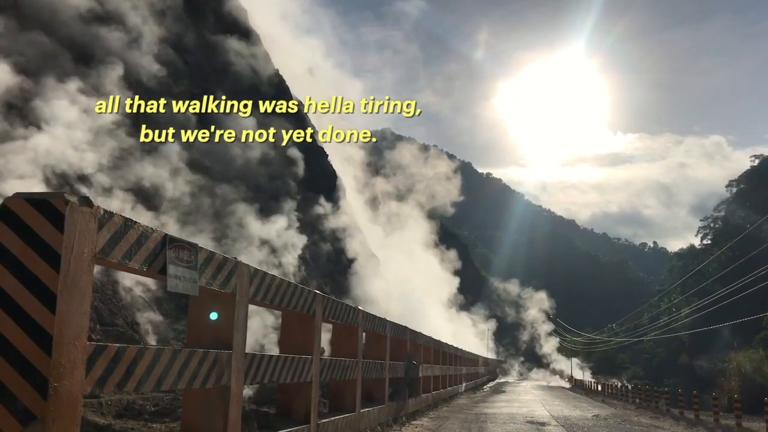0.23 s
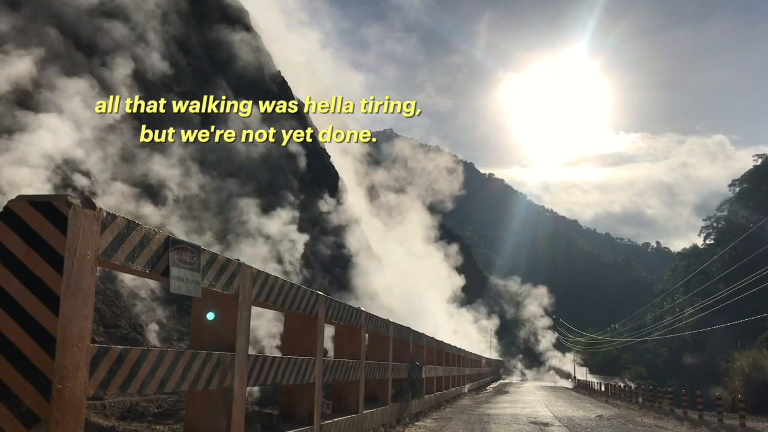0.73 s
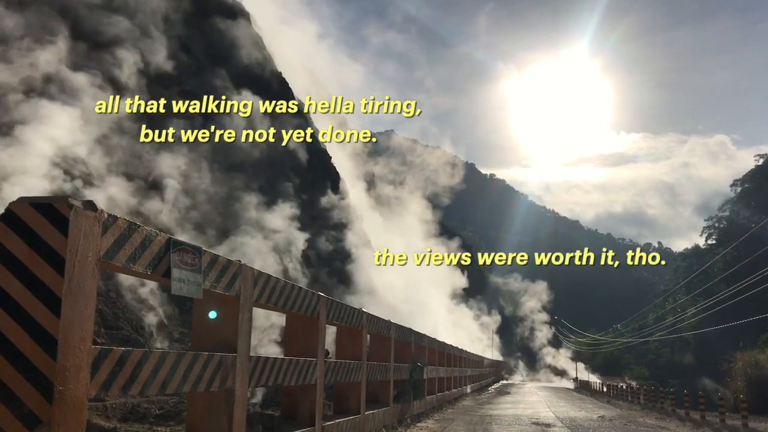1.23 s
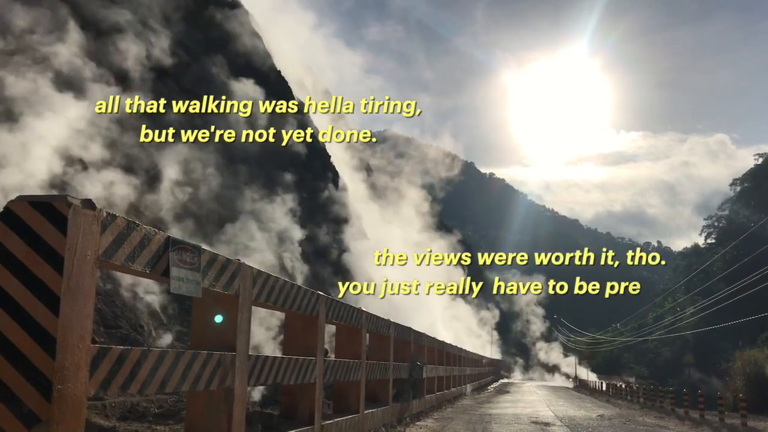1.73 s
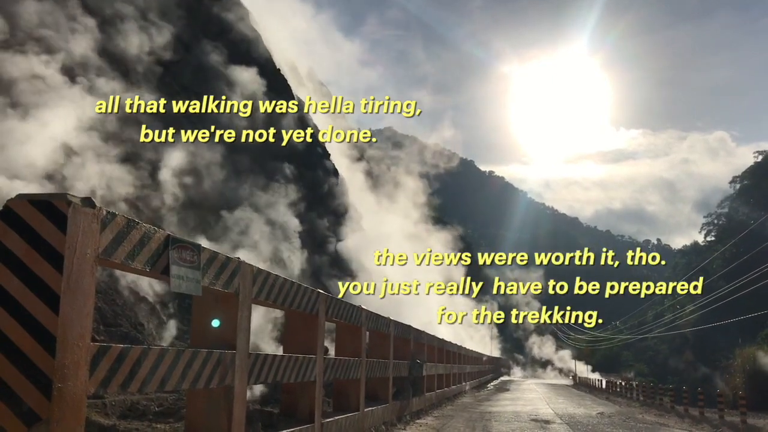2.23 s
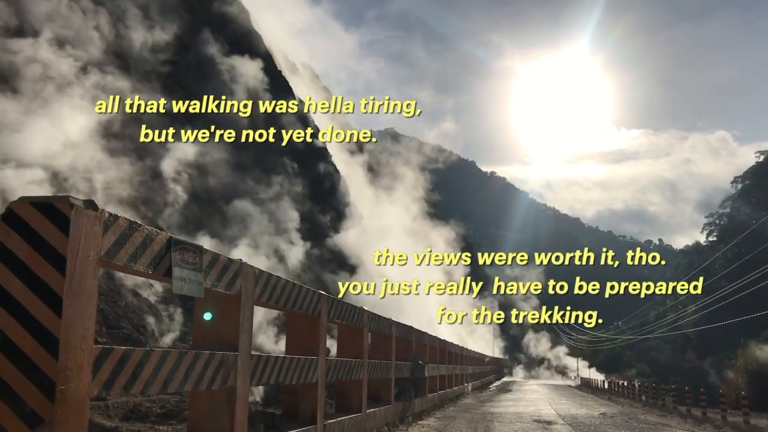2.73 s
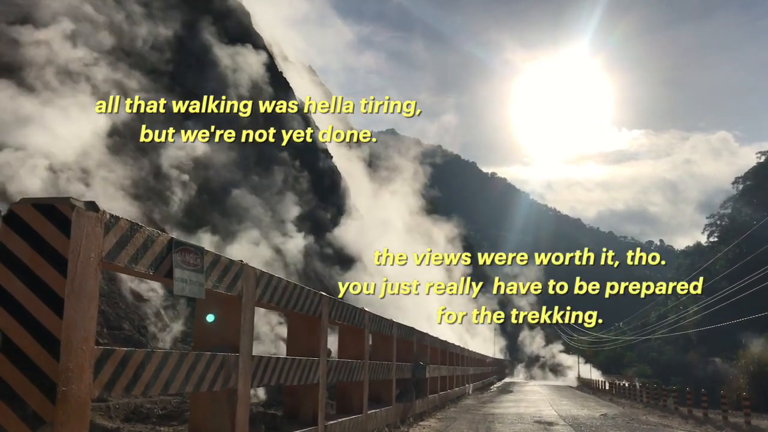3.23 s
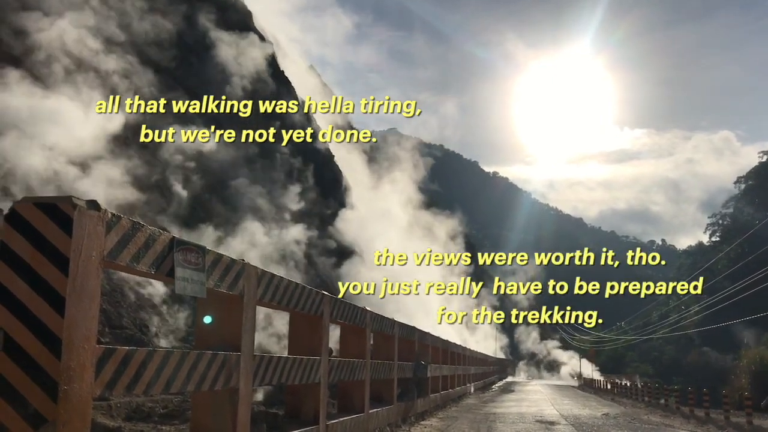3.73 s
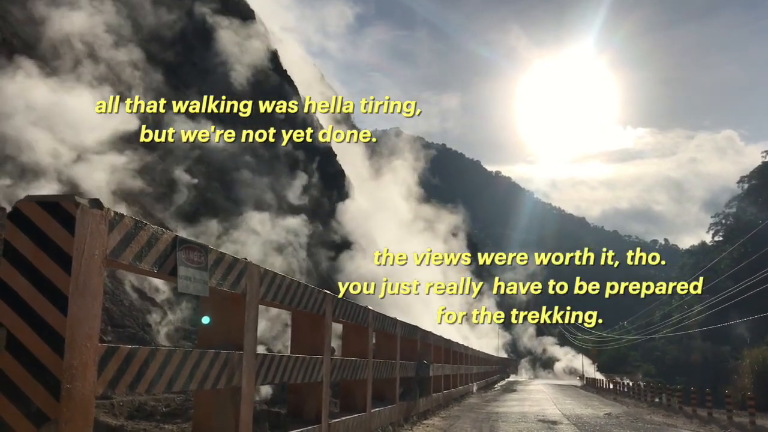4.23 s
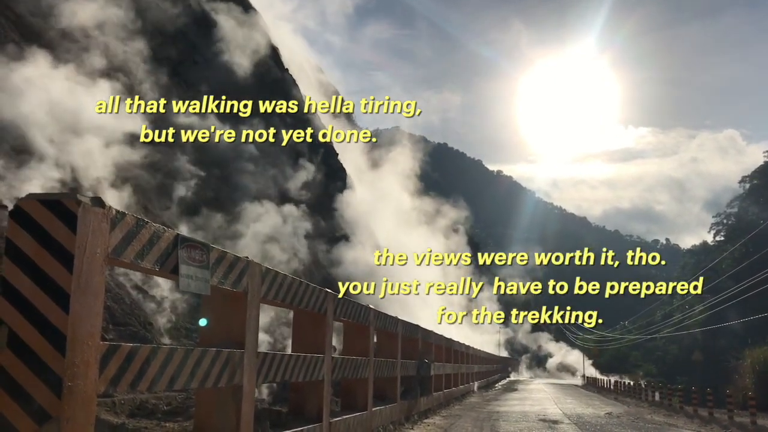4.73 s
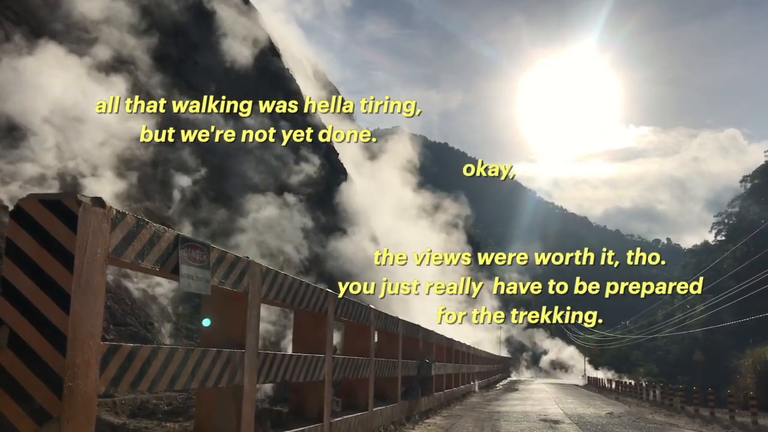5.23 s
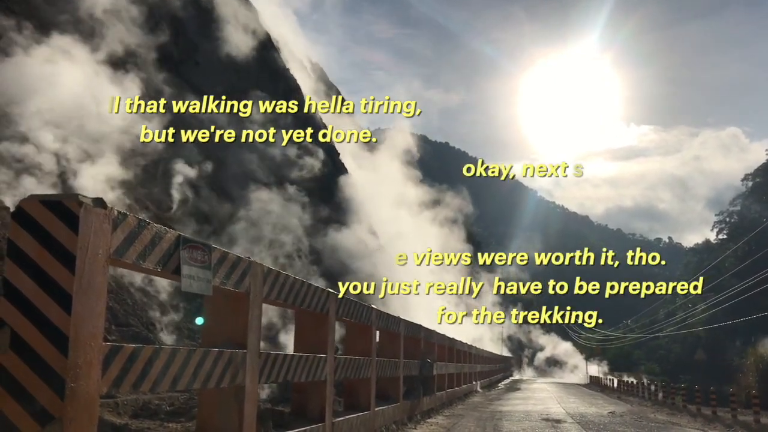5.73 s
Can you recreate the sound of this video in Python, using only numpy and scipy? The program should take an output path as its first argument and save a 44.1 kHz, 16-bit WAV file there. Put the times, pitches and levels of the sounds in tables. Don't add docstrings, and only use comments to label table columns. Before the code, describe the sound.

Steam hisses steadily from a hillside while a slow vehicle's engine drones low, trim ticks and rattles, and small birds whistle faintly far away.

```python
import sys
import numpy as np
from scipy import signal
from scipy.fft import rfft, irfft, next_fast_len
from scipy.io import wavfile
from scipy.ndimage import uniform_filter1d

SR = 44100
rng = np.random.default_rng(int(sys.argv[2]) if len(sys.argv) > 2 else 0)


def store_pcm(level_fs):
    pcm = np.round(np.clip(level_fs, -1, 1) * 32767).astype(np.int16)
    wavfile.write(sys.argv[1], SR, np.atleast_2d(pcm).T)


def gain_from_db(level_db):
    decades = np.asarray(level_db, float) / 20
    return 10 ** decades


N = 263277
T = np.arange(N) / SR
SIZE = next_fast_len(N)
HZ = np.maximum(np.arange(SIZE // 2 + 1) * SR / SIZE, 1)


def walk(rate):
    hold = int(SR / rate)
    steps = rng.standard_normal(N // 100)[:N // hold + 1]
    drift = np.repeat(steps, hold)
    drift = uniform_filter1d(uniform_filter1d(drift, hold), hold)[:N]
    return drift / drift.std()


def turbulence(colour, swell_db, flicker_db, flicker_rate, tilt_db=0):
    hz, db = np.transpose(colour)
    colour_db = np.interp(np.log(HZ), np.log(hz), db, left=-90, right=-90)
    spectrum = rfft(rng.standard_normal(SIZE)) * gain_from_db(colour_db)
    swell = swell_db * walk(1.18)
    out = np.zeros(N)
    for centre in hz[0] * 2 ** np.arange(0, np.log2(hz[-1] / hz[0]) + .5, .5):
        window = np.cos(np.pi * np.clip(np.log2(HZ / centre), -.5, .5)) ** 2
        treble = np.clip(np.log2(centre / 2500), 0, 1)
        motion_db = swell + flicker_db * walk(flicker_rate) + treble * tilt_db
        out += irfft(spectrum * window, SIZE)[:N] * gain_from_db(motion_db)
    return out / np.sqrt(np.mean(out ** 2))


def band(x, lo_hz, hi_hz):
    return signal.sosfilt(signal.butter(2, [lo_hz, min(hi_hz, .45 * SR)], "band", fs=SR, output="sos"), x)


def arched_calls():
    # (crest time [s], lead-in [s], tail [s], crest pitch [Hz], level [dB])
    arches = [(.035, -.012, .058, 3200, -44), (.912, .045, .052, 3165, -44),
              (1.818, .025, .105, 3140, -47.5), (2.735, .042, .1, 3140, -46), (3.64, .025, .045, 3170, -52),
              (4.565, -.02, .115, 3140, -48), (5.05, .005, .072, 3650, -49)]
    rise_s, droop_s, droop_hz = .078, .058, 660
    for s, lead, tail, hz, db in arches:
        t = np.arange(-lead, tail, 1 / SR)
        droop = 1 - np.exp(-(t / np.where(t < 0, rise_s, droop_s)) ** 2)
        yield s - lead, hz - droop_hz * droop, db - 65 * np.abs(t - .015)


def sliding_calls():
    # (start time [s], length [s], start pitch [Hz], resting pitch [Hz], level [dB])
    slides = [(3.115, .08, 2800, 2330, -46), (3.505, .022, 4200, 2900, -45), (3.54, .022, 3050, 2100, -46),
              (3.932, .115, 4000, 2460, -48), (4.366, .115, 4200, 2480, -45),
              (4.812, .105, 4100, 2500, -45), (5.282, .085, 3650, 2450, -47), (5.53, .06, 3200, 2500, -54),
              (5.552, .048, 4500, 3650, -43)]
    settle_s, fade_db_s = .03, 30
    throat_hz, throat_width_hz, throat_db = 3020, 200, 6
    for s, length, start, rest, db in slides:
        t = np.arange(0, length, 1 / SR)
        hz = rest + (start - rest) * np.exp(-t / settle_s)
        off_throat = 1 - np.exp(-((hz - throat_hz) / throat_width_hz) ** 2)
        yield s, hz, db - fade_db_s * t - throat_db * off_throat


def plain_calls():
    # (start time [s], length [s], start pitch [Hz], end pitch [Hz], level [dB])
    plain_notes = [(.245, .043, 3850, 4030, -52), (.722, .02, 2930, 3160, -48), (1.47, .1, 3540, 4050, -57),
                   (2.475, .05, 2950, 2680, -55), (3.19, .038, 2230, 2480, -54),
                   (3.385, .025, 2440, 2860, -53), (3.46, .025, 3000, 3180, -52),
                   (3.72, .059, 2620, 2450, -55), (3.82, .035, 2540, 3060, -54),
                   (5.165, .025, 2794, 2643, -52.5), (5.385, .081, 2945, 2940, -55),
                   (5.388, .085, 3360, 3335, -51), (5.47, .075, 3350, 3290, -54)]
    u = rng.random((170, 4))
    pitch, fall = 2400 + 900 * u[:, 1], 700 * (u[:, 2] - .3)
    start_s, length_s = 2.45 + 3.4 * u[:, 0], .012 + .03 * u[:, 3]
    far = np.transpose([start_s, length_s, pitch + fall / 2, pitch - fall / 2, -57 - 4 * u[:, 3]])
    for s, length, start, end, db in np.concatenate([plain_notes, far]):
        yield s, np.linspace(start, end, int(length * SR)), db


def birds():
    out = np.zeros(N)
    wobble_hz = 15 * walk(120)
    for s, hz, db in [*arched_calls(), *sliding_calls(), *plain_calls()]:
        i, u = int(s * SR), np.linspace(0, 1, len(hz))
        hz = hz + wobble_hz[i:i + len(u)]
        swell = np.abs(np.sin(np.pi * u)) ** .3
        out[i:i + len(u)] += np.sqrt(2) * gain_from_db(db) * swell * np.sin(2 * np.pi * np.cumsum(hz) / SR)
    out = out * gain_from_db(2.4 * walk(160))
    t = T[:SR // 4]
    slope = rng.standard_normal(len(t)) * gain_from_db(-39 - 60 * t / .35)
    return out + signal.fftconvolve(out, slope)[:N]


def pings():
    # (time [s], pitch [Hz], t60 [s], level [dB])
    knocked_parts = [(.38, 4450, .02, -32), (.858, 3700, .012, -30), (1.788, 1600, .04, -32),
                     (.323, 5900, .03, -40), (.556, 4300, .03, -42)]
    out = np.zeros(N)
    for s, hz, t60, db in knocked_parts:
        t = np.maximum(T - s, 0)
        onset = 1 - np.exp(-t / .001)
        out += gain_from_db(db - 60 * t / t60) * onset * np.sin(2 * np.pi * hz * t)
    return out


def bumps():
    # (time [s], pitch [Hz], length [s], level [dB])
    road_bumps = [(1.166, 97, 0.029, -15.5), (1.175, 50, 0.058, -26), (2.595, 102, 0.058, -31),
                  (4.89, 79.76, 0.046, -27), (5.214, 75, .05, -24.5), (.82, 55.03, .04, -32),
                  (2.98, 72.5, 0.075, -26.5), (5.414, 45, 0.049, -27)]
    out = np.zeros(N)
    for s, hz, length, db in road_bumps:
        swing = np.cos(2 * np.pi * hz * (T - s - .004))
        out += gain_from_db(db) * np.exp(-(3 * (T - s) / length) ** 2) * swing
    return out


def rattle():
    # (time [s], centre [Hz], level [dB])
    trim_ticks = [(.105, 11000, -48), (.156, 10000, -46), (.173, 7900, -43), (.26, 11000, -47),
                  (.316, 14500, -43), (.455, 11400, -46), (.668, 10600, -42.5), (.8, 10300, -49),
                  (.829, 9600, -45), (.829, 14800, -42), (.889, 14800, -44), (1.323, 10670, -50),
                  (1.752, 9640, -42), (1.929, 9300, -48), (1.992, 15320, -44), (2.206, 11710, -45.5),
                  (2.364, 12100, -43), (3.439, 12700, -44), (3.647, 7800, -45), (3.865, 10500, -47),
                  (4.22, 11400, -49), (4.377, 15180, -46), (4.756, 13100, -50), (4.83, 7505, -47),
                  (5.045, 13100, -47), (5.051, 15200, -39), (5.321, 15330, -49), (5.668, 10500, -45.5),
                  (5.825, 13530, -40), (5.845, 10950, -48.5),
                  (.327, 6200, -46), (.454, 6200, -47), (.621, 6240, -47), (.893, 7600, -48),
                    (1.171, 5500, -48), (1.722, 6500, -46), (2.1, 6900, -44), (2.203, 6500, -44.5),
                    (2.298, 6500, -48), (2.667, 5200, -45), (3.031, 4770, -42), (3.256, 5540, -45.5),
                    (3.42, 6930, -42.5), (3.878, 5200, -47), (4.005, 5515, -45.5), (4.368, 5200, -44.5),
                    (5.433, 5910, -43), (5.72, 5900, -45.5), (5.769, 4800, -45), (5.93, 4800, -44)]
    u = rng.random((350, 3))
    faint_db = -53.5 - 3 * u[:, 1] - 2 * np.log(1 - .93 * u[:, 2])
    faint = np.transpose([u[:, 0] * (N - 1) / SR, 3500 + 11500 * u[:, 1], faint_db])
    t = T[:SR // 40] - 1 / 80
    shape = np.exp(-(t / 0.0011) ** 2) + 0.23 * np.exp(-(t / 0.013) ** 2)
    out = np.zeros(N + 2 * len(t))
    for s, hz, db in np.concatenate([trim_ticks, faint]):
        noise = rng.standard_normal(len(t))
        burst = (band(noise, 0.815 * hz, 1.15 * hz) + 0.35 * band(noise, 3200, 12400)) * shape
        strength = np.sqrt(np.sum(burst ** 2) / (0.0027 * SR))
        i = int(s * SR)
        out[i:i + len(t)] += burst / strength * gain_from_db(db + 4.5)
    return out[len(t) // 2:][:N]


def road():
    # (frequency [Hz], density [dB per Hz])
    rumble_colour = [(20, -30), (36, -22), (50, -9), (65, 1.5), (90, 0), (115, 0), (140, -2.5), (200, -8.5),
                     (226, -4.5), (250, -9.5), (330, -16), (450, -26), (600, -47)]
    rumble = turbulence(rumble_colour, swell_db=0.0, flicker_db=-0.8, flicker_rate=5.4)
    middle_s, half_s, extra_db = 3.2, 0.66, 3
    return rumble * gain_from_db(-37 + extra_db * np.exp(-((T - middle_s) / half_s) ** 2))


def engine():
    # (time [s], shaft rate [Hz], level of order 4 [dB])
    engine_course = [(0, 24.97, -35), (1, 24.96, -35.5), (2.3, 24.97, -36.5), (2.65, 25.08, -37.5),
                     (3, 25.22, -34.5), (3.65, 25.9, -34), (4.3, 26.64, -33.5), (5, 26.59, -33.5),
                     (5.97, 26.67, -32.5)]
    # (multiple of shaft rate, level under order 4 [dB], gain with shaft rate [dB per Hz],
    #  slow wander [dB], gain with speeding up [dB per Hz/s])
    other_orders = [(1, -17.5, -1.5, -6, 0), (2, -11, -1, 3, 4), (3, -1.5, -2.5, 1, -4.5),
                    (5, -9.5, -0.5, 1.5, 1), (6, -16.5, 3.5, -1, -2.5), (7, -18, 3, -0.5, -0.5),
                    (8, -26, 4.5, 2.5, 3.5), (9, -17.5, -1.5, 1, -1.5), (10, -26.5, 2, 1, -2),
                    (12, -25, -1.5, 0.5, 0)]
    s, *columns = np.transpose(engine_course)
    hz, main_db = (np.interp(T, s, c) for c in columns)
    speeding = uniform_filter1d(np.gradient(hz) * SR, SR // 4)
    orders = [(4, main_db)]
    for k, db, rise, wander, pull in other_orders:
        order_db = main_db + db + rise * (hz - 25) + wander * walk(2.93) + pull * speeding
        orders.append((round(k), order_db))
    phase = 2 * np.pi * np.cumsum(hz * (1 + .002 * walk(5.993))) / SR
    drone = np.zeros(N)
    for k, db in orders:
        delay = 0.3 * walk(4.6) + np.pi / 2 * k ** 2
        drone += gain_from_db(db + 1.6 * walk(7)) * np.sin(k * phase + delay)
    return np.sqrt(2) * drone


def near_puff():
    # (time [s], level [dB])
    puff_course = [(0, -42.5), (.12, -46), (.2, -47.5), (.3, -47), (.42, -49.5), (.55, -62), (.8, -75)]
    # (frequency [Hz], density [dB per Hz])
    puff_colour = [(600, -35), (1100, 2), (2200, -6), (4000, -4), (5800, -8), (7500, -8), (9200, -6.5),
                   (10500, -9), (15000, -25)]
    puff = turbulence(puff_colour, swell_db=-4.5, flicker_db=2.5, flicker_rate=31)
    return puff * gain_from_db(np.interp(T, *np.transpose(puff_course)))


def steam():
    # (time [s], level [dB])
    rush_course = [(0, -42), (.45, -41.5), (.6, -42.5), (2, -43), (3, -43), (5.2, -43), (5.97, -42.5)]
    # (frequency [Hz], density [dB per Hz])
    hiss_colour = [(180, -22.5), (300, -1), (461, -5.5), (686, -2.5), (783, -8), (864, -4.5), (1110, -8),
                   (1330, -8.5), (2040, -12.5), (3090, -14.5), (4900, -18.5), (6600, -19.5), (10300, -25.5),
                   (11800, -25), (15600, -29)]
    flutter_db = .6 * walk(35)
    hiss = turbulence(hiss_colour, swell_db=0.16, flicker_db=0.75, flicker_rate=16, tilt_db=flutter_db)
    return hiss * gain_from_db(np.interp(T, *np.transpose(rush_course)) + 2.5)


def near_panels(x):
    # (frequency [Hz], width [Hz], gain [dB])
    panel_gains = [(853, 18, -0.5), (1290, 37, 4.5), (3030, 57, -0.5), (4880, 200, -3.5), (7560, 720, -3),
                   (10500, 790, -5.5)]
    spectrum = rfft(x, SIZE)
    for hz, width, db in panel_gains:
        spectrum = spectrum * gain_from_db(db / (1 + (2 * (HZ - hz) / width) ** 2))
    return irfft(spectrum, SIZE)[:N]


def scene():
    airborne = near_panels(birds() + rattle() + near_puff() + steam())
    return (airborne + pings() + bumps() + road() + engine())[None]


def low_pass(x):
    return signal.sosfilt(signal.butter(12, 16780, fs=SR, output="sos"), x)


def record(dry):
    top_hz = 15770
    cut = irfft(rfft(dry, SIZE) * np.clip((top_hz - HZ) / 40, 0, 1), SIZE)[:, :N]
    return low_pass(cut)


dry = scene()
out = record(dry)
store_pcm(out)
```